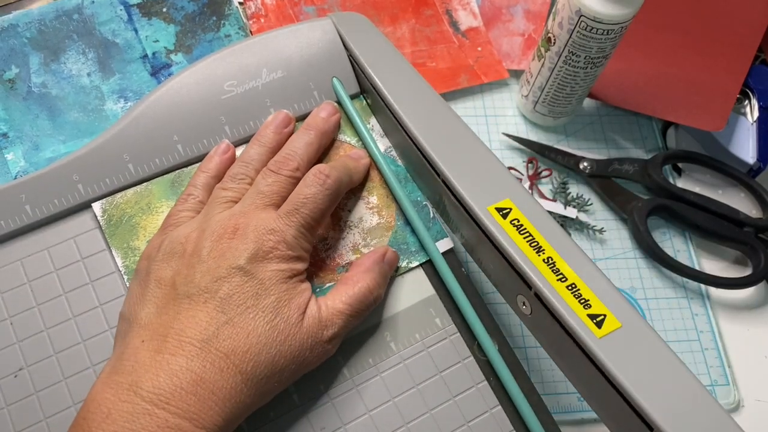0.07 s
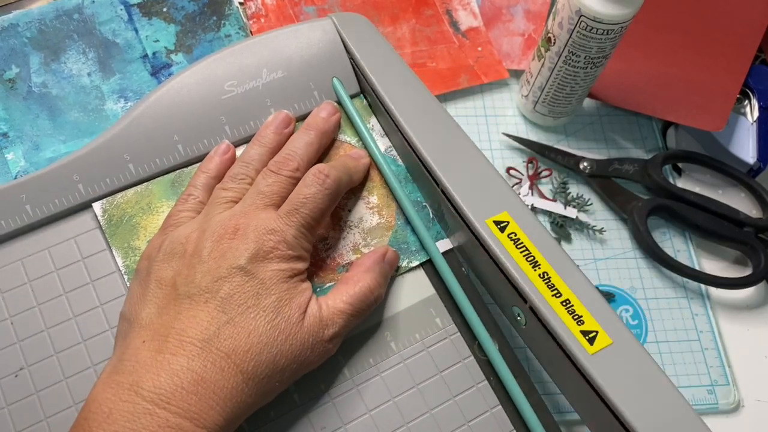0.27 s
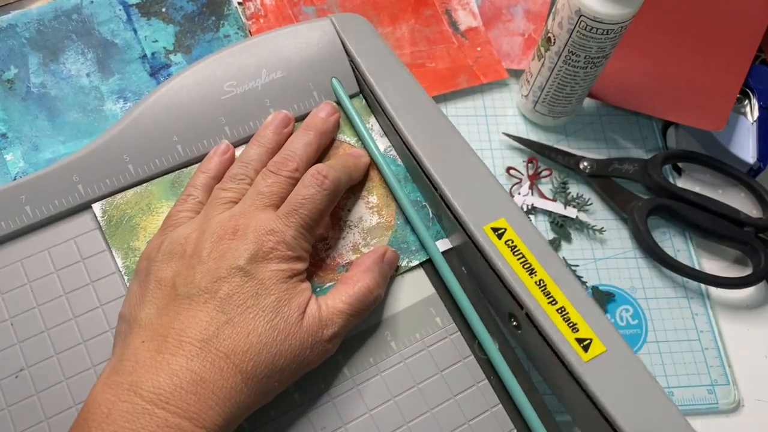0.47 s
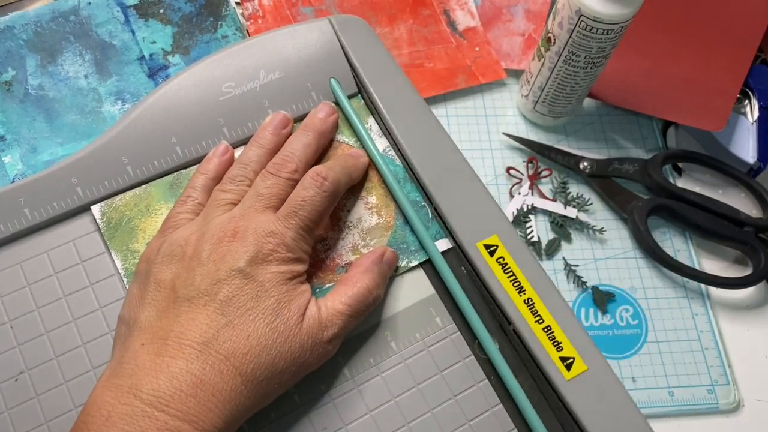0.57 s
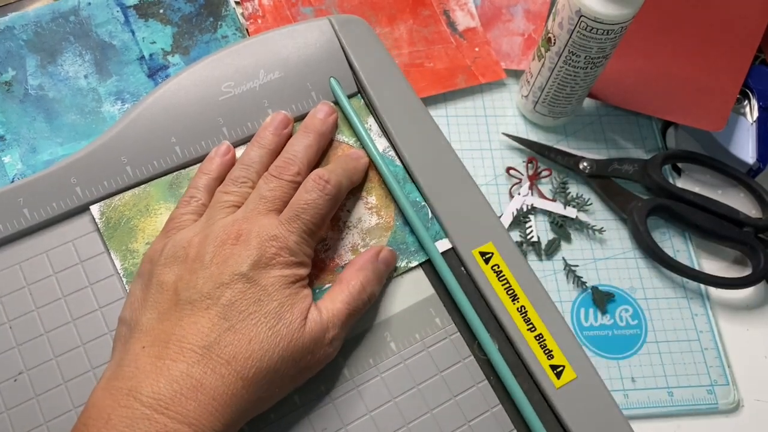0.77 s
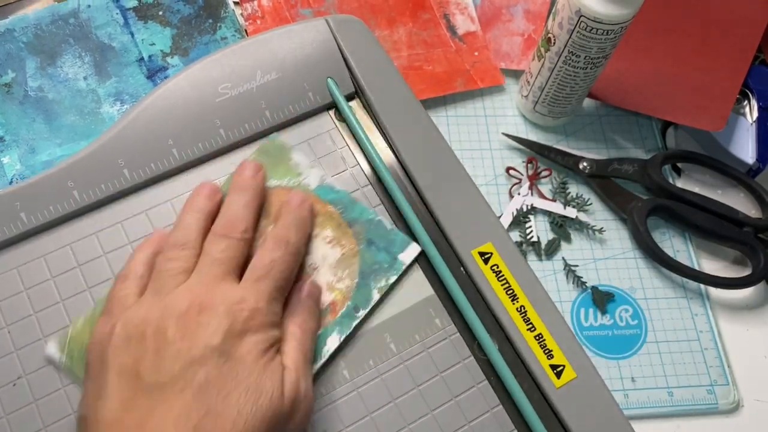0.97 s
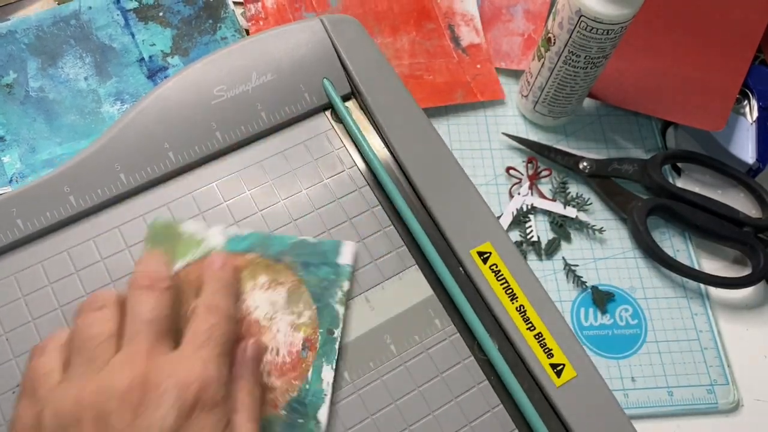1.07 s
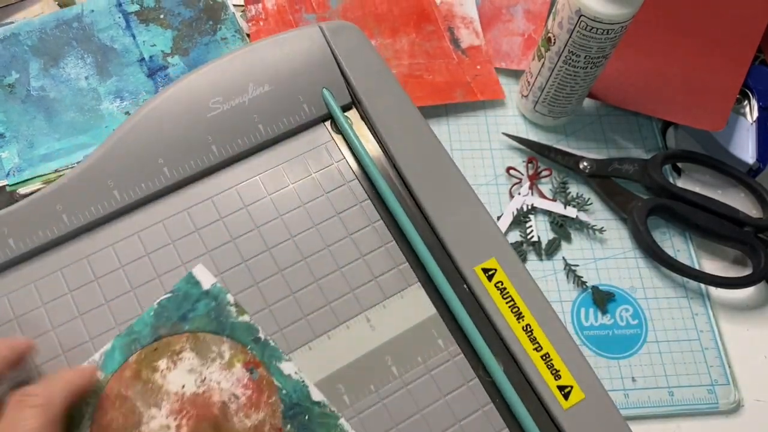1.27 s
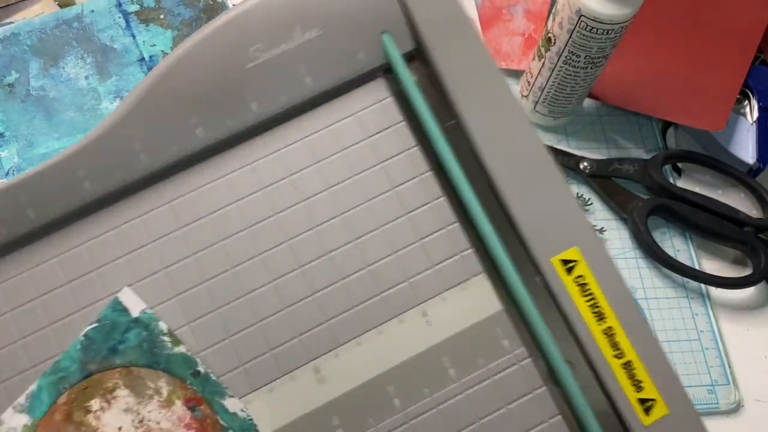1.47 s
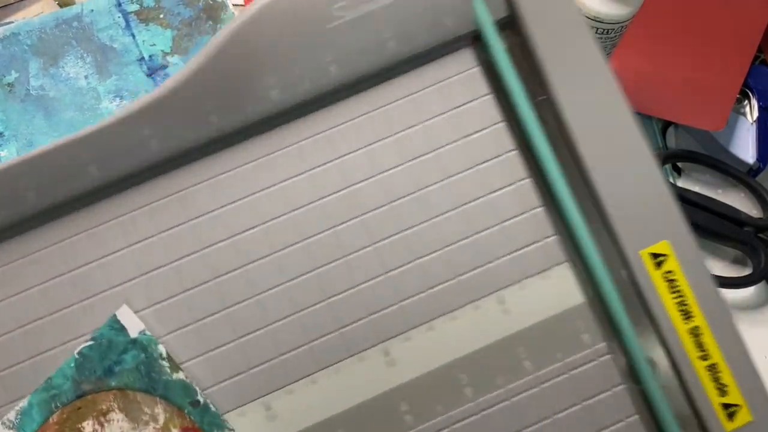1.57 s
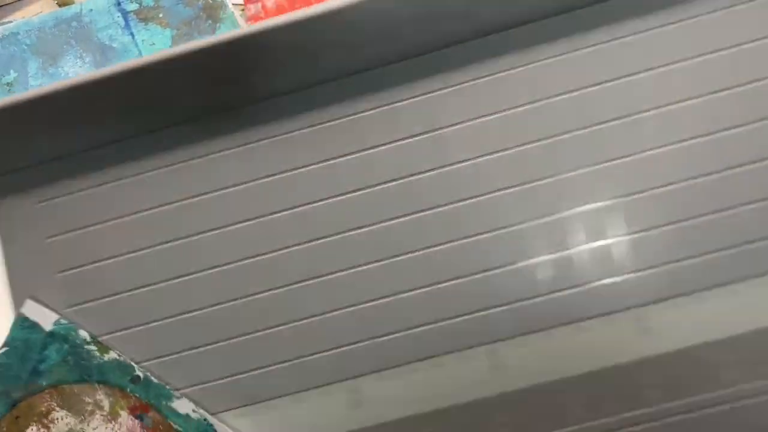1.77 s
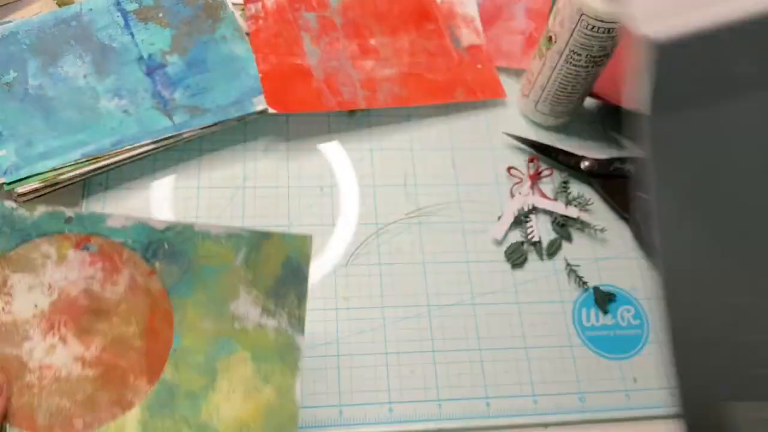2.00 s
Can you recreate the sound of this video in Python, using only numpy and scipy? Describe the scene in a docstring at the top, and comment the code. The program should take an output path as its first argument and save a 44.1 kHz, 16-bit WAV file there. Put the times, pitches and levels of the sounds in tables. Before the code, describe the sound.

Close up in a small room, a paper cutter's arm crunches through card twice and bangs on its stop, then light scraping and taps, a sharp clattering knock against the table, and fading rubbing with a dry snap.

```python
"""A guillotine paper trimmer on a craft table, close to a stereo camera: the blade arm shears card in two rasping
strokes, made of random jolts ringing base, blade and card, and lands on its stop with knocks of damped modes and
noise. A hand slides the card away over the plastic base, as scraping noise with light taps and snaps, and the
trimmer knocks the table as it is lifted off. Low handling rumble, a small room and quiet room tone lie behind."""
import sys
import numpy as np
from scipy import signal
from scipy.fft import rfft, irfft, next_fast_len
from scipy.io import wavfile
from scipy.ndimage import uniform_filter1d, map_coordinates

SR = 44100
rng = np.random.default_rng(int(sys.argv[2]) if len(sys.argv) > 2 else 0)


def invert_db(x):
    """Field ratio 10**(x/20) for x, a level in decibels (scalar or array-like)."""
    u = np.asarray(x, float) / 20
    return 10 ** u


def dump(signal):
    """Clip the signal to [-1, 1] and save it as 16-bit WAV at the path in sys.argv[1]."""
    limited = np.clip(np.atleast_2d(signal).T, -1, 1)
    pcm = np.round(limited * 32767).astype(np.int16)
    wavfile.write(sys.argv[1], SR, pcm)


N = 89875  # length of the scene in samples


def unit(x):
    """Scales x to rms 1."""
    return x / np.sqrt(np.mean(x ** 2) + 1e-20)


def along(points, hz):
    """Reads (Hz, value) points on a log frequency axis."""
    f, v = np.transpose(points)
    return np.interp(np.log(hz + 1), np.log(f + 1), v)


def curves(rows):
    """One value per sample for each column after the time."""
    s, *columns = np.transpose(rows)
    return [np.interp(np.arange(N) / SR, s, column) for column in columns]


def wobble(rate):
    """A smooth random curve, rate knots a second."""
    knots = rng.standard_normal(int(N * rate / SR) + 4)
    return map_coordinates(knots, [np.arange(N) * rate / SR])


def filtered(x, response):
    """x through a complex response of frequency."""
    n = x.shape[-1]
    m = next_fast_len(n + 8192)
    return irfft(rfft(x, m) * response(np.fft.rfftfreq(m, 1 / SR)), m)[..., :n]


def resonances(peaks):
    """Causal response of parallel resonances (Hz, width Hz, dB), with alternating signs."""
    def response(f):
        total = 0
        for k, (centre, width, db) in enumerate(peaks):
            band = 1j * f * width / (centre * centre - f * f + 1j * f * width)
            total = total + (-1) ** k * invert_db(db) * band
        return total
    return response


def softening(hz):
    """Low-pass response of four equal poles at 3000 Hz, which blunts the jolts."""
    return 1 / (1 + 1j * hz / 3000) ** 4


def coloured(x, spectrum):
    """x shaped by a spectrum (Hz, dB), rms 1."""
    return unit(filtered(x, lambda hz: invert_db(along(spectrum, hz))))


def patchy(x, patchy_db):
    """x with patches of random gain in time and frequency."""
    z = signal.stft(x, nperseg=256)[2]
    field = uniform_filter1d(rng.standard_normal(z.shape), 3, 0)
    field = uniform_filter1d(field, 7, 1)
    return signal.istft(z * invert_db(patchy_db * unit(field)), nperseg=256)[1][:N]


def dying(t60s, shape):
    """Noise of energy 1 whose bands die at their own speed, t60s (Hz, s)."""
    hz, t, z = signal.stft(rng.standard_normal(shape), SR, nperseg=128)
    decay = invert_db(-60 * t / along(t60s, hz)[:, None])
    tail = signal.istft(z * decay, SR, nperseg=128)[1]
    return tail / np.linalg.norm(tail, axis=-1, keepdims=True)


def slips(per_s, spread_db, clump_db):
    """Tiny stick-slip jolts of uneven size, in clumps."""
    struck = rng.random(N) < per_s / SR
    jolts = struck * rng.standard_normal(N) * invert_db(spread_db * rng.exponential(size=N))
    return unit(jolts * invert_db(clump_db * wobble(100)))


def gliding(x, hz, width_hz):
    """x rings one resonance whose pitch moves: shifted to 0 Hz, low-passed and shifted back."""
    turn = np.exp(2j * np.pi * np.cumsum(hz) / SR)
    pole = np.exp(-np.pi * width_hz / SR)
    return unit(np.real(turn * signal.lfilter([1], np.poly([pole, pole]), x / turn)))


def groaning():
    """The base groans under the load of the first stroke and sags as the arm stops: a gliding sine."""
    # the groan's course: start_s, pitch_hz, level_db
    groan = [(0.255, 310, -65), (0.275, 315.3, -23), (0.287, 240, -45), (0.297, 170, -30.5),
             (0.32, 151, -37.5), (0.335, 152, -60), (0.39, 153, -50), (0.42, 150, -71)]
    t = np.arange(N) / SR
    pitch_hz, level_db = curves(groan)
    phase = 2 * np.pi * np.cumsum(pitch_hz * (1 + 0.05 * wobble(60))) / SR
    sounding = (t > groan[0][0]) * (t < groan[-1][0])
    return invert_db(level_db) * np.sqrt(2) * np.sin(phase) * sounding


def shearing():
    """The edge tears fibre after fibre; the jolts shake base, blade and card and fizz in the air."""
    # the two strokes: start_s, base_thrum_db, blade_rasp_db, fibre_fizz_db, card_edge_hz, card_edge_db
    strokes = [
        [(0.138, -85, -96, -92, 1350, -91), (0.153, -40.5, -52, -60, 1350, -56),
         (0.178, -45, -37, -44, 1350, -47), (0.183, -41.5, -36.5, -44, 1350, -45),
         (0.215, -31, -27, -33.5, 1355, -43), (0.262, -31.5, -33, -33.5, 1400, -43),
         (0.284, -27, -30.5, -35.5, 1430, -35), (0.295, -35, -70, -78, 1470, -71),
         (0.33, -105, -86, -80, 1500, -91)],
        [(0.395, -73, -79, -100, 1350, -86), (0.416, -38.5, -53, -55, 1350, -49.5),
         (0.422, -42.5, -50, -48, 1350, -54), (0.454, -33.5, -28, -36.5, 1350, -36.5),
         (0.47, -29.5, -29.5, -41, 1030, -56.5), (0.505, -35.5, -38.5, -39, 1000, -34),
         (0.552, -44.5, -55, -35, 1320, -38), (0.558, -44, -34.5, -34, 1470, -27),
         (0.61, -37, -29.5, -34, 1490, -30.5), (0.64, -45, -28.5, -36, 1720, -26.5),
         (0.653, -43, -37.5, -24.5, 1750, -36.5)],
    ]
    # resonances of the plastic base: centre_hz, width_hz, relative_db
    base_peaks = [(280, 215, 1.5), (612, 23.4, 7.5)]
    # resonances of the blade arm: centre_hz, width_hz, relative_db
    blade_peaks = [(805, 79, 2.5), (1118, 92, -3), (1350, 40, 2), (1756, 28, 5), (2317, 98, 8.5)]
    # spectrum of the torn fibres: frequency_hz, relative_db_per_hz
    fibres = [(1650, -37), (2800, 3), (4000, -2), (5700, -1.5), (7000, -4.5), (8700, -9), (11000, -9),
              (13000, -16), (15800, -13), (16300, -56.5)]
    edge_width_hz, overtone_ratio, overtone_db = 360, 1.75, -8

    t = np.arange(N) / SR
    jolts = slips(per_s=6000, spread_db=1, clump_db=0.6)
    soft = filtered(jolts, softening)
    base = unit(filtered(soft, resonances(base_peaks)))
    blade = unit(patchy(filtered(soft, resonances(blade_peaks)), patchy_db=2.5))
    fizz = unit(patchy(coloured(jolts, fibres), patchy_db=2))
    out = groaning()
    for rows in strokes:
        thrum_db, rasp_db, fizz_db, edge_hz, edge_db = curves(rows)
        on = np.clip(np.minimum(t - rows[0][0], rows[-1][0] - t) / .002, 0, 1)  # 2 ms fades
        overtone = gliding(soft, overtone_ratio * edge_hz, edge_width_hz)
        edge = unit(gliding(soft, edge_hz, edge_width_hz) + invert_db(overtone_db) * overtone)
        body = invert_db(thrum_db) * base + invert_db(rasp_db) * blade
        out = out + on * (body + invert_db(edge_db) * edge + invert_db(fizz_db) * fizz)
    return out


def ringing(modes, t, scatter_db):
    """Damped modes (Hz, dB, t60 s) set off together, their levels scattered at random."""
    out = 0
    for hz, db, t60 in modes:
        envelope = invert_db(db + scatter_db * rng.standard_normal() - 60 * t / t60)
        out = out + envelope * np.sin(2 * np.pi * hz * t)
    return out


def blows():
    """Each blow rings trimmer, feet and table as damped modes and rattles the loose parts as dying noise."""
    # the blows: start_s, trimmer_ring_db, feet_thump_db, table_boom_db, clatter_db, tilt_db_per_octave
    # (the tilt brightens ring and clatter alone)
    blow_rows = [(0.0005, -82, -46, -54, -42, 1), (0.281, -55, -61, -40, -40, 5),
                 (0.466, -43.5, -52.5, -50, -27.5, 1.5), (0.6525, -12.5, -29, -36, -14, 0.5),
                 (0.6599, -18.5, -35.5, -35, -23.5, 1), (0.685, -65, -27.5, -51, -30, 6),
                 (1.297, -67, -57, -30, -68, 1), (1.402, -60.5, -61.5, -42.5, -35, 5),
                 (1.4063, -25, -40, -54.5, -10, 7), (1.4112, -9, -29.5, -11.5, -20, 1),
                 (1.4273, -22.5, -45, -49.5, -18.5, -2.5)]
    # modes of the trimmer: frequency_hz, relative_db, t60_s
    trimmer = [(238.9, 0, 0.06), (323, 4, 0.075), (382, 0, 0.07), (465, 0, 0.07), (570, 2, 0.05),
               (800, -8, 0.06), (1170, -9, 0.03), (1305, -4, 0.05), (1620, -9, 0.03), (2020, -2, 0.025),
               (2330, -6, 0.04), (3740, -14, .03), (5380, -19, 0.02)]
    # the base bouncing on its feet: frequency_hz, relative_db, t60_s
    feet = [(60.6, 1.5, 0.083), (143.1, 5, 0.28)]
    # mode of the table top: frequency_hz, relative_db, t60_s
    table_top = [(83, 1, .34)]
    # spectrum of the loose parts: frequency_hz, relative_db_per_hz
    clatter = [(150, -23.5), (350, -7), (600, -7), (1090, -9), (2200, -13), (3500, -21), (5400, -25),
               (9900, -33), (15800, -27), (16500, -69)]
    # decay of the loose parts: frequency_hz, t60_s
    clatter_t60 = [(200, 0.18), (1000, 0.051), (4000, 0.056), (12000, 0.015)]

    out, t = np.zeros(N + SR), np.arange(SR // 2) / SR
    onset = 1 - np.exp(-t / 0.0011)
    for s, ring_db, thump_db, boom_db, clatter_db, tilt_db in blow_rows:
        tilt = lambda hz: tilt_db * np.log2(hz / 1000 + 0.03)
        noise = dying(clatter_t60, len(t))[:len(t)]
        rattle = filtered(noise, lambda hz: invert_db(along(clatter, hz) + tilt(hz)))
        rattle = rattle / np.sqrt(np.mean(rattle[:SR // 100] ** 2))  # rms 1 over the first 10 ms
        tilted = [(hz, db + tilt(hz), t60) for hz, db, t60 in trimmer]
        ring = invert_db(ring_db) * ringing(tilted, t, scatter_db=2.5)
        thump = invert_db(thump_db) * ringing(feet, t, scatter_db=1)
        boom = invert_db(boom_db) * ringing(table_top, t, scatter_db=1)
        out[round(s * SR):][:len(t)] += onset * (ring + thump + boom + invert_db(clatter_db) * rattle)
    return out[:N]


def sliding():
    """Skin and card scrape over ribbed plastic, from a spread-out area: two independent jolt noises."""
    # hand, card and trimmer sliding, in two spells: start_s, scrape_db, hollow_over_scrape_db
    slide = [
        [(0.74, -62, -6), (0.814, -65.5, -3.5), (0.858, -53.5, -3), (1.056, -44.5, -12), (1.08, -49.5, -6),
         (1.184, -52.5, -12), (1.24, -58.5, -1.5), (1.292, -54, -3), (1.378, -59.5, -9), (1.39, -54, -1)],
        [(1.5, -56.5, -25), (1.534, -53.5, -8), (1.62, -40.5, -1.5), (1.684, -44.5, -12), (1.77, -46, -1),
         (1.844, -55.5, -4), (1.854, -39, -16), (1.864, -52.5, -1.5), (1.914, -54.5, -6.5), (1.968, -63, -8.5),
         (2.037, -85, 1)],
    ]
    # spectrum of the scrape: frequency_hz, relative_db_per_hz
    scrape = [(1290, -37.5), (2200, -7.5), (2600, -7.5), (3600, -7), (4800, -6.5), (6300, -10), (9000, -13),
              (12000, -11), (15800, -18.5), (16300, -59)]
    # resonances of the hollow part: centre_hz, width_hz, relative_db
    hollow_peaks = [(1350, 1080, -3), (1700, 420, 3), (2097, 50, -2)]

    scrape_db, hollow_db = curves(sum(slide, []))
    start = np.clip((np.arange(N) / SR - slide[0][0][0]) / 0.019, 0, 1)  # 19 ms fade-in
    pair = []
    for _ in range(2):
        jolts = slips(per_s=27000, spread_db=1.0, clump_db=0.5)
        hollow = unit(filtered(jolts, lambda hz: resonances(hollow_peaks)(hz) * softening(hz)))
        rubbing = patchy(coloured(jolts, scrape) + invert_db(hollow_db) * hollow, patchy_db=3.5)
        pair.append(start * invert_db(scrape_db) * rubbing)
    return pair


def taps():
    """The card's edge taps the plastic base: dying noise through resonances of its thin top."""
    # the taps: start_s, level_db, tilt_db_per_octave
    tap_rows = [(1.0606, -39, -4), (1.1117, -44.5, 4.5)]
    # resonances of the tapped top: centre_hz, width_hz, relative_db
    tapped = [(450, 150, -4.5), (602, 50, 5.5), (830, 110, -0.5), (1315, 64, -5.5), (1580, 120, -4),
              (2290, 50, -11.5)]
    t60_s = 0.09

    out, t = np.zeros(N), np.arange(SR // 5) / SR
    for s, db, tilt_db in tap_rows:
        tilt = lambda hz: invert_db(tilt_db * np.log2(hz / 1000 + .1))
        chatter = invert_db(-60 * t / t60_s) * rng.standard_normal(len(t))
        tap = filtered(chatter, lambda hz: resonances(tapped)(hz) * tilt(hz))
        tap = tap / np.sqrt(np.mean(tap[:SR // 100] ** 2))  # rms 1 over the first 10 ms
        out[round(s * SR):][:len(t)] = invert_db(db) * tap
    return out


def ticks():
    """Dry snaps of card: short dying noise, high-passed to be bright."""
    # the snaps: start_s, level_db (before the high-pass)
    tick_rows = [(0.207, -40), (1.286, -50), (1.852, -31)]
    t60_s, from_hz = 0.026, 3700

    out, t = np.zeros(N), np.arange(SR // 20) / SR
    for s, db in tick_rows:
        out[round(s * SR):][:len(t)] = invert_db(db - 60 * t / t60_s) * rng.standard_normal(len(t))
    return filtered(out, lambda hz: (1j * hz / (from_hz + 1j * hz)) ** 2)


def handling():
    """Handling shakes table and base: two low noises, the base's rumble lumpy."""
    # the shaking, in three spells: start_s, table_hum_db, base_rumble_db
    shake = [
        [(0.03, -82, -53.5), (0.13, -64, -70), (0.188, -60, -47), (0.294, -59, -59), (0.382, -57, -60.5),
         (0.478, -32.5, -36.5), (0.58, -63.5, -47.5), (0.64, -44, -41)],
        [(0.74, -41.5, -55), (0.952, -70, -65.5), (1.06, -60.5, -57), (1.162, -49.5, -57.5),
         (1.25, -40.5, -45.5), (1.302, -36.5, -44), (1.358, -54, -60.5), (1.39, -55, -44)],
        [(1.62, -55.5, -57), (1.72, -56, -54.5), (1.748, -74, -55), (1.818, -47, -52), (1.902, -53.5, -50.5),
         (1.918, -84, -60), (1.944, -58.5, -60), (2.037, -89, -68)],
    ]
    # spectrum of the table top's hum: frequency_hz, relative_db_per_hz
    hum_spectrum = [(15, -68), (25, -35.5), (51, -8), (70, 1.5), (87, -7), (125, -14.5), (160, -36.5),
                    (280, -120)]
    # spectrum of the base's rumble: frequency_hz, relative_db_per_hz
    rumble_spectrum = [(76, -46), (130, 0.5), (167, -12.5), (221, -1), (464, -1.5), (604, -7), (1000, -14),
                       (1300, -44), (2200, -120)]

    hum_db, rumble_db = curves(sum(shake, []))
    hum = coloured(rng.standard_normal(N), hum_spectrum)
    lumps = invert_db(0.94 * wobble(33.0))
    rumble = lumps * coloured(rng.standard_normal(N), rumble_spectrum)
    return invert_db(hum_db) * hum + invert_db(rumble_db) * rumble


def room(x):
    """The small room's diffuse answer, two dying noise tails with little bass, after 200 samples."""
    # decay of the room: frequency_hz, t60_s
    room_t60 = [(200, 0.14), (2000, 0.18), (10000, 0.14)]
    from_hz = 630
    tail = dying(room_t60, (2, SR // 2))
    tail = filtered(tail, lambda hz: hz ** 4 / (hz ** 4 + from_hz ** 4))
    return signal.fftconvolve(np.pad(x, (200, 0))[None], tail, axes=1)[:, :N]


def room_tone():
    """Steady air of the room: coloured noise at -60 dB rms."""
    # spectrum of the room tone: frequency_hz, relative_db_per_hz
    air = [(20, -36.5), (60, 0), (160, -6), (500, -19), (1000, -27.5), (1900, -25), (3700, -22),
           (8000, -37), (15800, -42), (16300, -76.5)]
    return invert_db(-60) * coloured(rng.standard_normal(N), air)


def microphones(x):
    """Level and phase between the two ports for a source right of centre, half given to each port."""
    # level of the left port over the right: frequency_hz, level_db
    left_over_right = [(150, 0), (290, .4), (640, -.8), (1410, -2), (3100, -2.5), (4200, -1), (4740, -6),
                       (5600, 0), (9000, 1.5), (11000, 0)]
    # phase lead of the left port: frequency_hz, lead_radians
    left_leads = [(60, -.05), (170, -.15), (350, -.75), (700, -1.3), (1200, -.95), (2330, 1), (2900, 1.7),
                  (4200, 1.2), (4740, 3.1), (5200, 5.6), (5800, 6.3), (9200, 8), (10700, 8.5),
                  (11600, 9.36)]
    half = lambda hz: invert_db(along(left_over_right, hz) / 2) * np.exp(.5j * along(left_leads, hz))
    return filtered(x, lambda hz: np.array([half(hz), 1 / half(hz)]))


def scene():
    """All sources at the microphones, left and right."""
    alike = 0.63  # share of the scrape's power weight that is common to the ports
    room_db, wide_room_db = -12.5, -3  # the wide part lies below the close part
    frontal_db = -19.5  # the part of the blows, taps and snaps that reaches both ports alike

    near, far = sliding()
    knocks = blows() + taps() + ticks()
    direct = shearing() + knocks + np.sqrt(alike) * near + handling()
    close, wide = invert_db(room_db) * room(direct)
    placed = microphones(direct + room_tone() + close)
    sides = invert_db(wide_room_db) * wide + 0.51 * np.sqrt(1 - alike) * far
    return placed + invert_db(frontal_db) * knocks + sides * [[1], [-1]]  # sides in opposite sign


def low_pass(x):
    """Removes everything above the highest recorded frequency."""
    return signal.sosfilt(signal.butter(12, 17000, fs=SR, output="sos"), x)


def record(dry):
    """Microphones weak in the deep bass, then a soft ceiling."""
    mic_from_hz, ceiling = 54.5, 0.97
    x = filtered(dry, lambda hz: (1j * hz / (mic_from_hz + 1j * hz)) ** 2)
    mix = x / (1 + np.abs(x / ceiling) ** 6) ** (1 / 6)
    return low_pass(mix)


dry = scene()
out = record(dry)
dump(out)
```